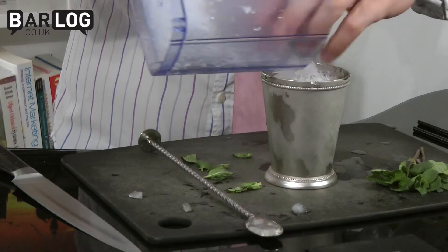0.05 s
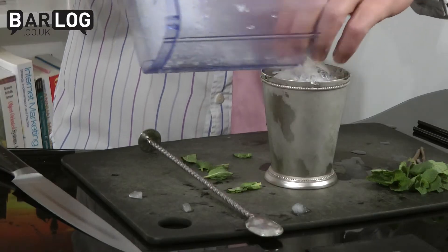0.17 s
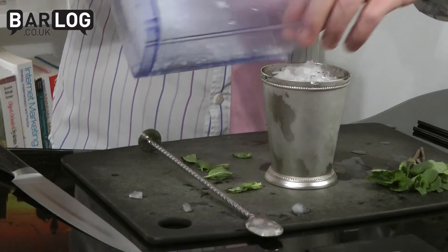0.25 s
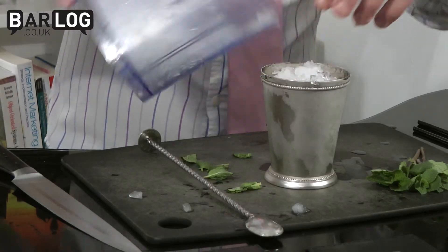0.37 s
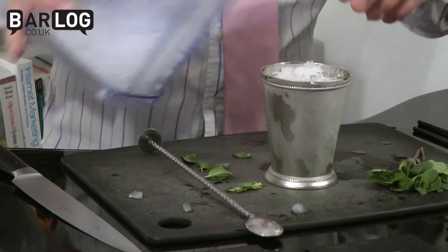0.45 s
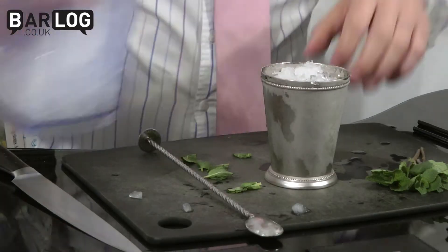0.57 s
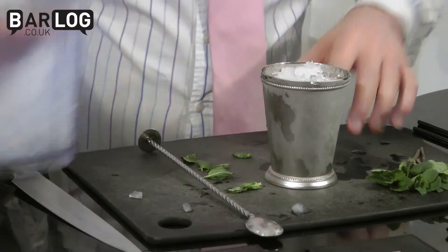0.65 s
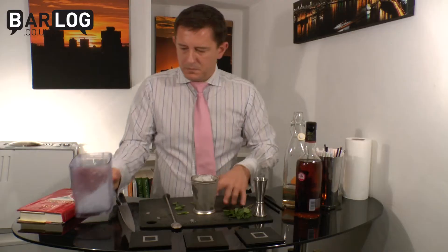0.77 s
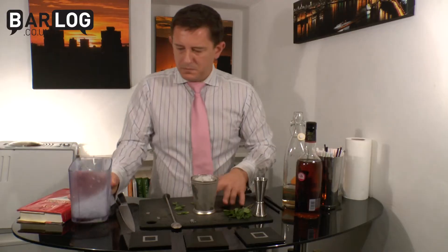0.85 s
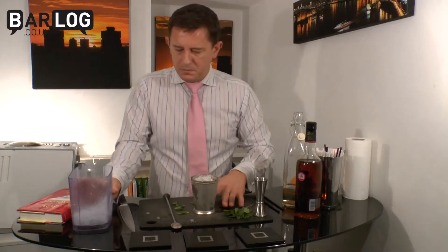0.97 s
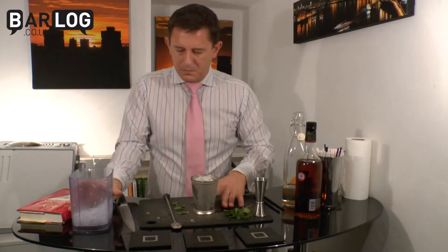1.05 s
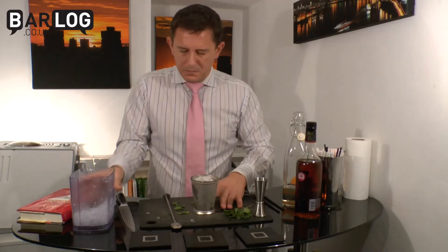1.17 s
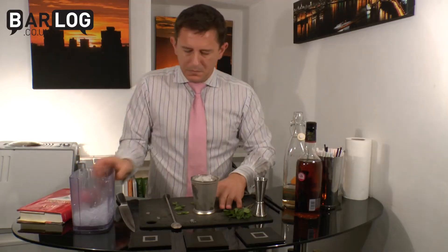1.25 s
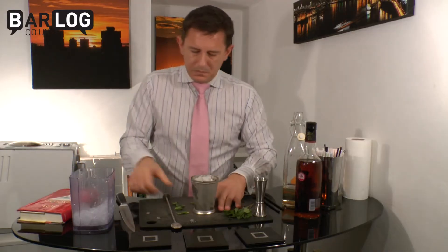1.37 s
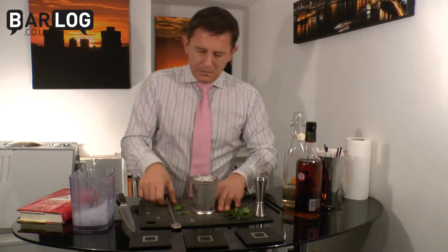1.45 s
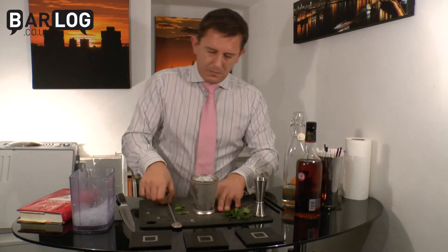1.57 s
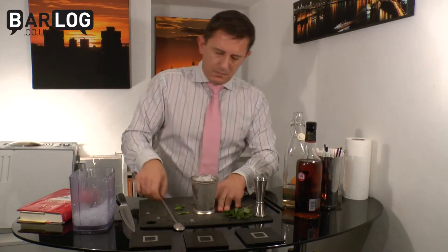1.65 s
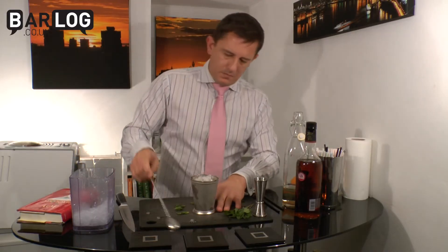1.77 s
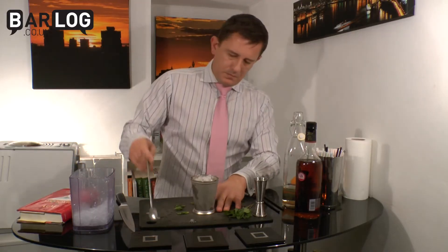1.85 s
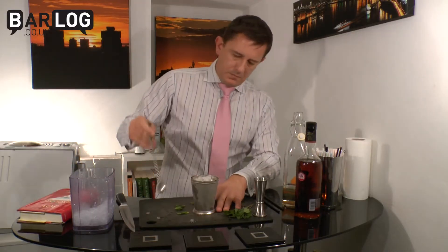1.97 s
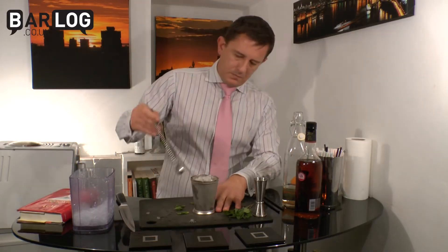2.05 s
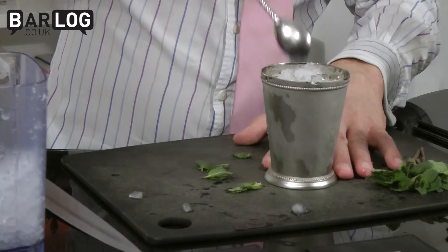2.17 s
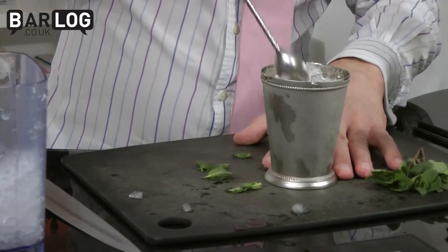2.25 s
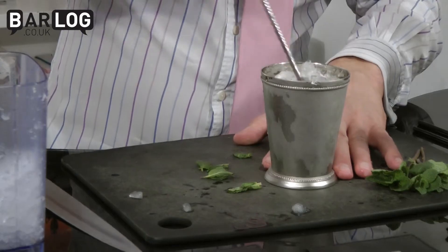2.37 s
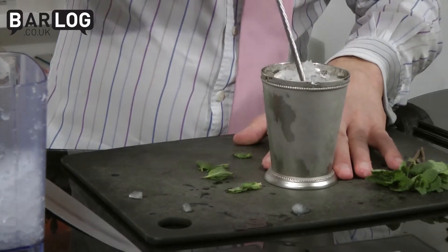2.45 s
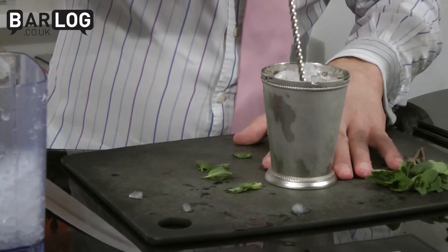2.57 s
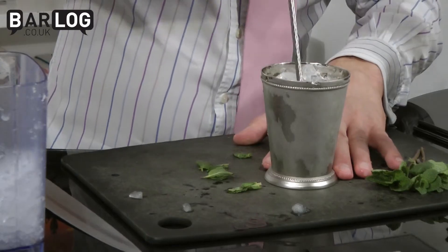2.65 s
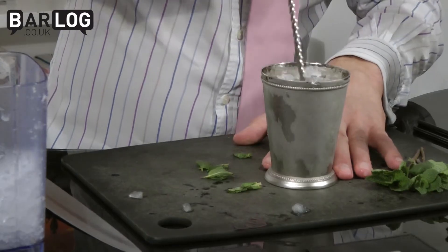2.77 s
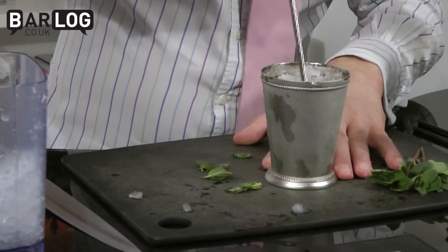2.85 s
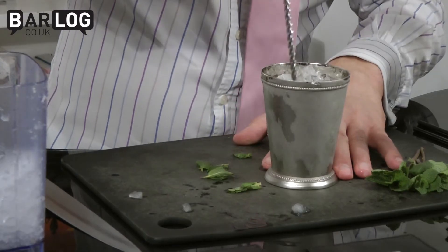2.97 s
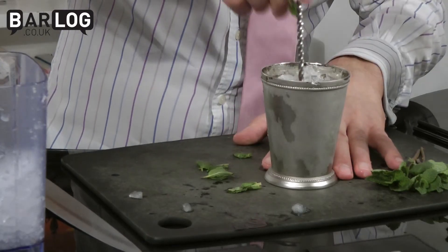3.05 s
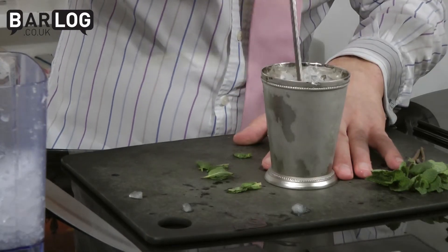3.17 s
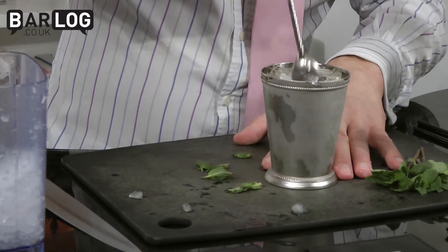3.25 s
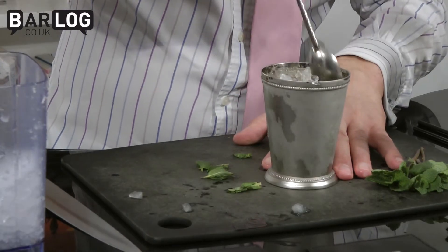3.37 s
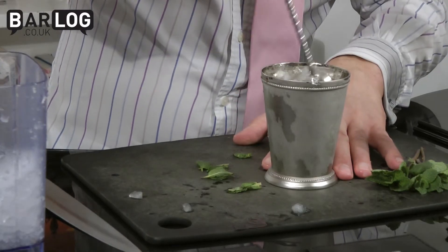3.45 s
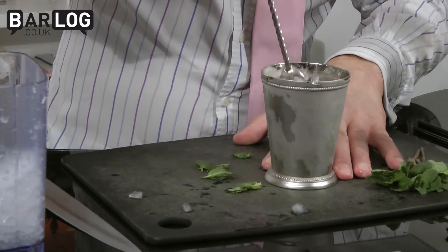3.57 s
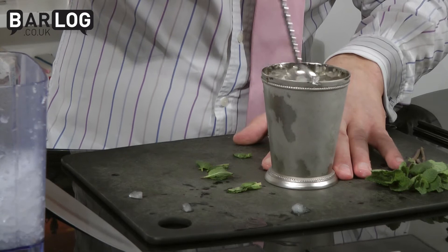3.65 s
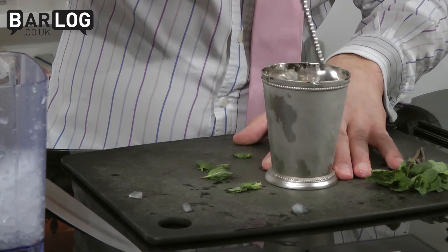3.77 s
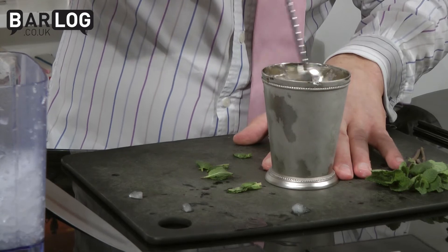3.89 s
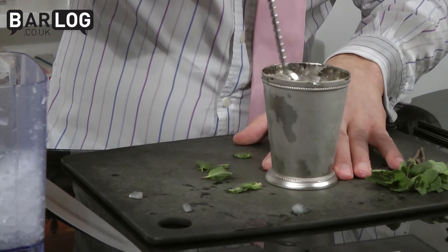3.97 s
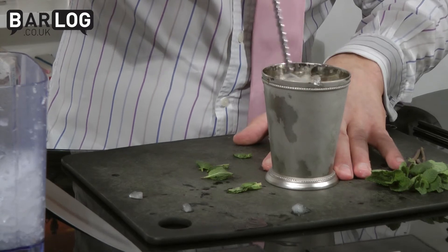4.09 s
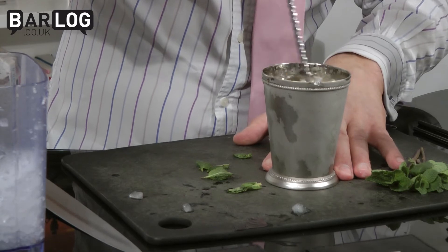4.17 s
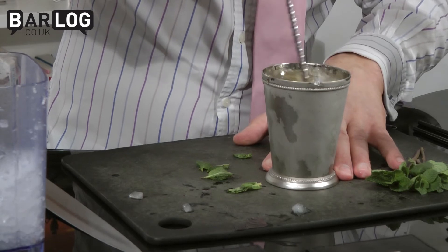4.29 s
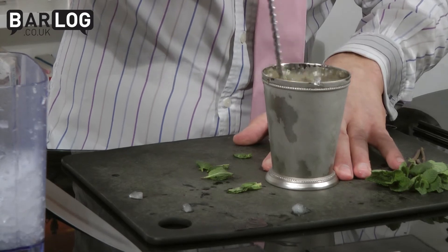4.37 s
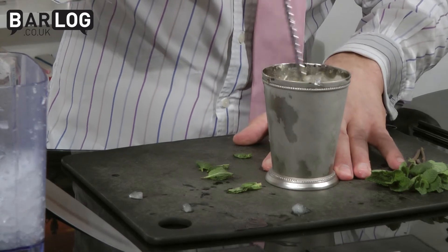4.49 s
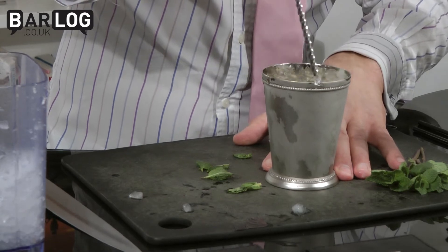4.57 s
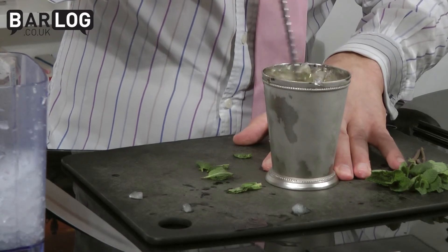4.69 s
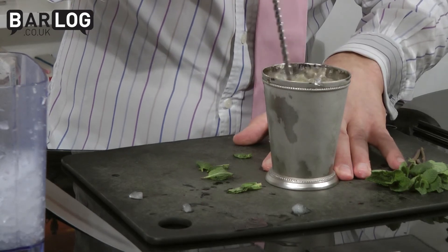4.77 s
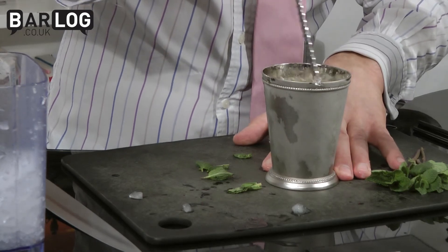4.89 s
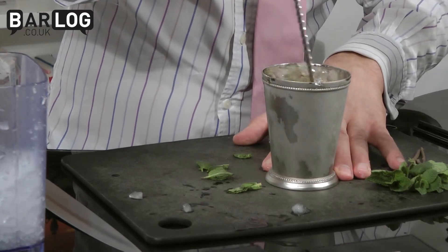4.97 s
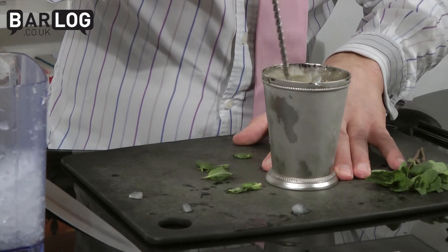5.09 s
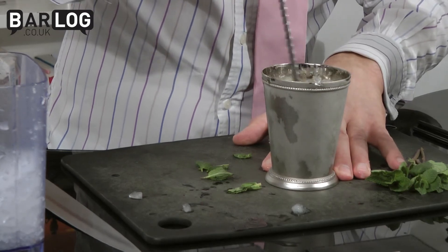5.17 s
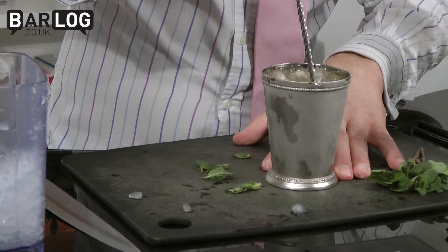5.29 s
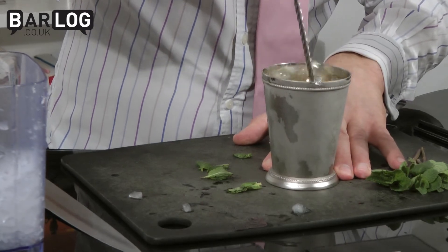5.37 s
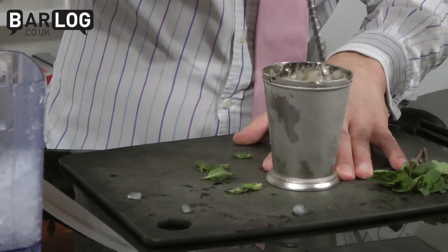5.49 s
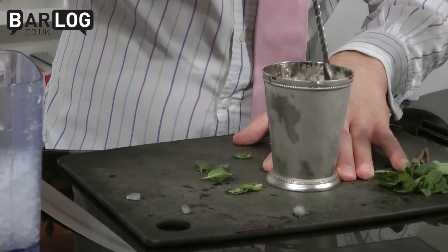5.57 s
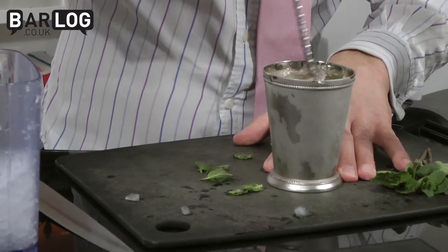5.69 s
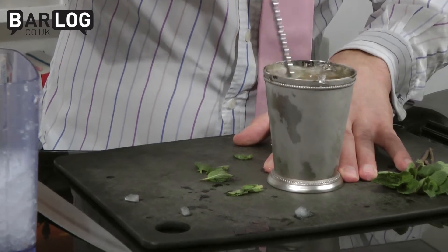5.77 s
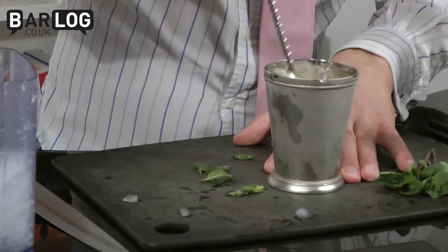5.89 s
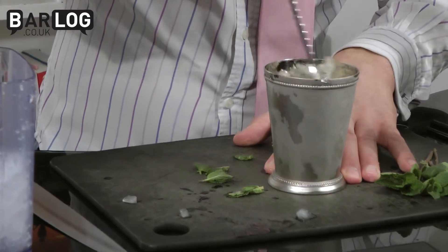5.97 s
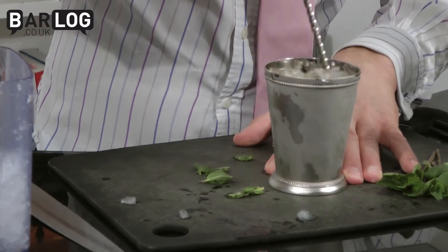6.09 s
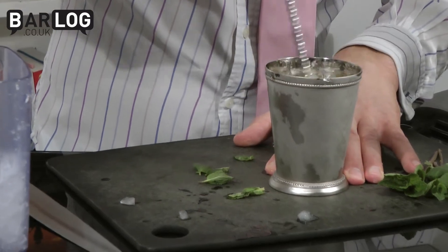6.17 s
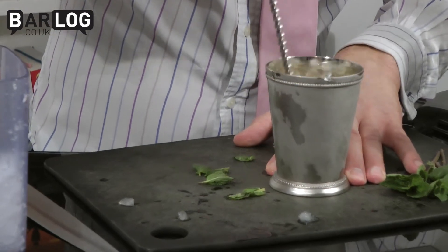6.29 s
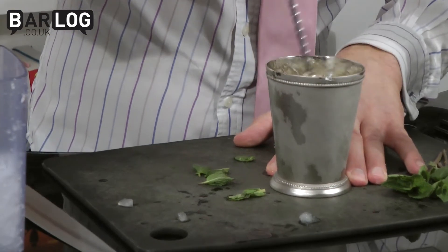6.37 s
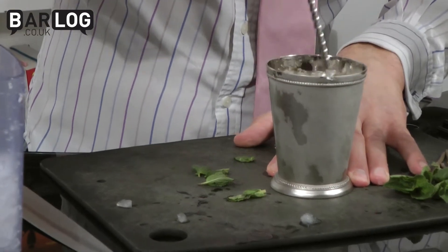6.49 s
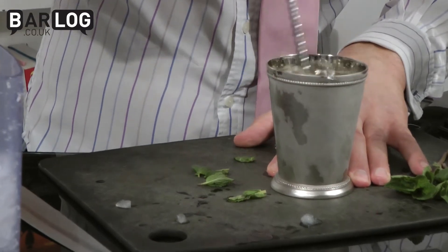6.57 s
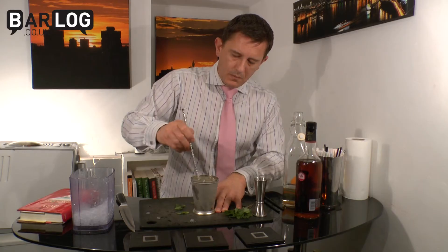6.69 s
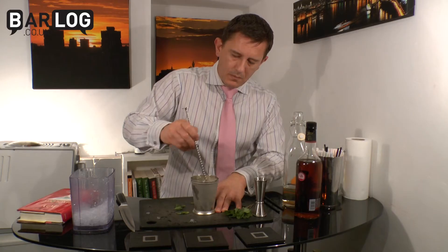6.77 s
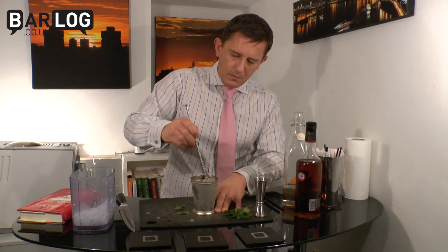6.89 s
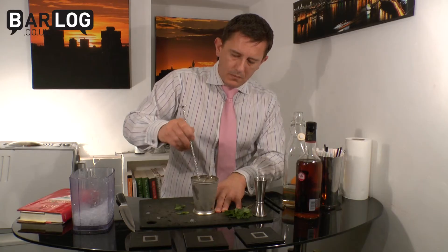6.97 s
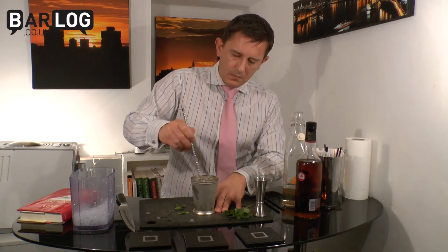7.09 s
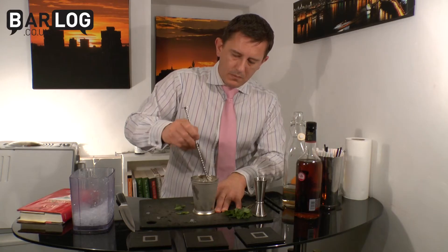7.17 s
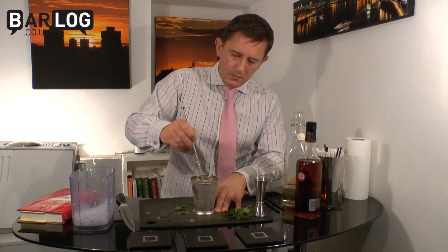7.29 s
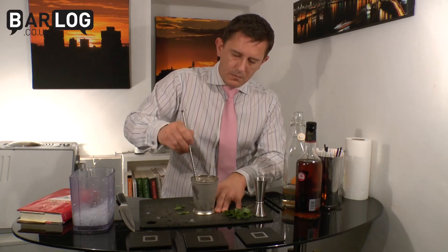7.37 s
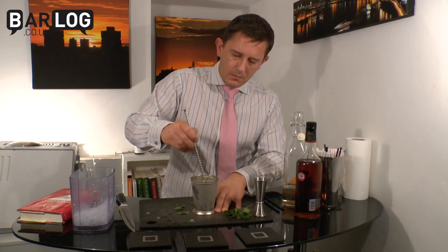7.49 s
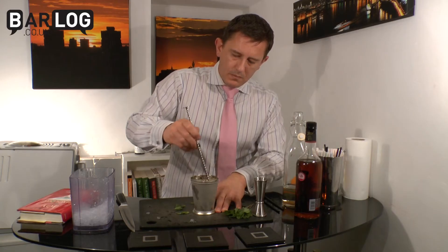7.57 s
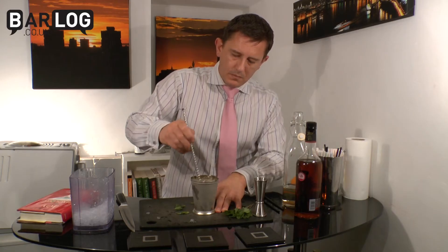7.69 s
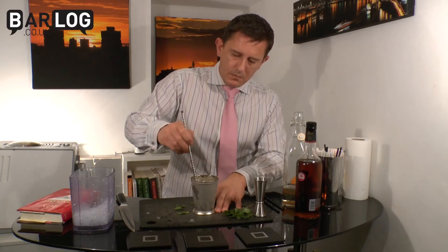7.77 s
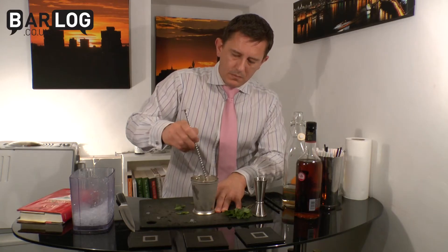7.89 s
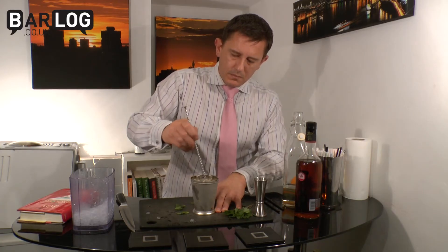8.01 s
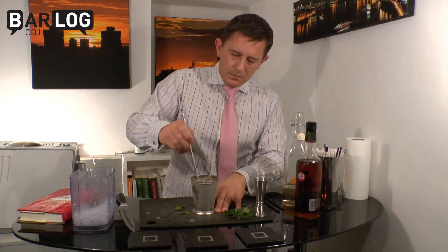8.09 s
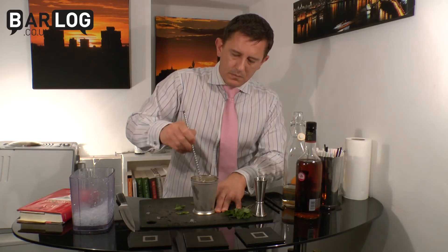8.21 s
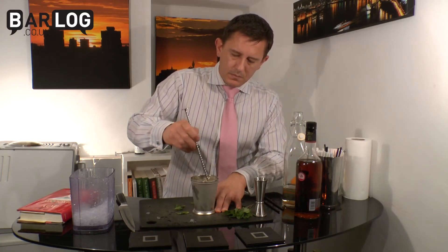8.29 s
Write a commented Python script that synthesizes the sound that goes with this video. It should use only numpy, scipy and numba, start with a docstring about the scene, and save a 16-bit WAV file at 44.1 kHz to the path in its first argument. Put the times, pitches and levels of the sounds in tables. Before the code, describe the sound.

Crushed ice slides and slaps in a plastic jug, the jug thuds down, a steel spoon rings, then crunchily churns ice in a metal cup.

```python
"""A fridge hums throughout: steady filtered noise with a thin whine. First crushed ice slides in a plastic jug
(many tiny decaying sines) and slaps its wall (noise bursts). At about 1 s the jug is set down on a glass table
and rocks; at 1.5 s a long steel spoon is picked up, ringing and scraping. From 2.3 s it churns the ice in a
metal cup, now and then striking wall and bottom. Noise tails make a small hard room answer all but the hum.
The right channel is the louder one, except in the deepest bass."""
import sys
import numpy as np
from scipy import signal
from scipy.fft import rfft, irfft, next_fast_len
from scipy.io import wavfile
from numba import njit

SR = 44100
rng = np.random.default_rng(int(sys.argv[2]) if len(sys.argv) > 2 else 0)


def waveform_to_disk(signal):
    """Save audio, clipped to [-1, 1], as 16-bit WAV at the path in sys.argv[1]."""
    frames = np.transpose(np.atleast_2d(signal))
    scaled = np.clip(frames, -1, 1) * 32767
    samples = np.round(scaled).astype(np.int16)
    wavfile.write(sys.argv[1], SR, samples)


N = 367794  # length in samples

# the jug meets the table and rocks: t/s, level/dB, level of the ice thrown about/dB, rise of that ice/s
JUG_DOWN = [(0.967, -1.5, -21, 0.0026), (1.058, -9, -22, 0.087)]
# the spoon strikes the cup: t/s, clink of the wall/dB, thud into the board/dB, favoured pitch f/Hz
CUP_HITS = [(2.5051, -14, -30, 6600), (2.5575, -11, -6, 3040), (2.5983, -46, -10.5, 6640),
            (3.0173, -15.5, -4.5, 2630), (3.0484, -18.5, -8, 3300), (3.1868, -21, -69, 6800),
            (3.48, -18.5, -60, 6300), (3.826, -11.5, -30, 4660), (4.3812, -21, -49, 5500),
            (4.8634, -24, -47, 5300), (4.9505, -14.5, -43, 3030), (5.115, -23, -55, 2770),
            (5.3, -24, -35, 2780), (5.4341, -27, -46, 6640), (5.6743, -11.5, -20, 6260),
            (5.9514, -35, -45, 4200), (5.9925, -5, -27, 3500), (6.2231, -15, -25.5, 2345),
            (6.6585, -18, -15.5, 2480), (6.7516, -22, -48, 7900), (7.3083, -21, -49, 5160),
            (7.4924, -19.5, -37, 9100), (7.6445, -19, -55, 4300), (7.7119, -20, -45, 4650),
            (7.9359, -20, -31, 3720), (8.1444, -18, -32, 5670), (8.2577, -21, -45, 6740)]
# tones of the board under the cup: f/Hz, level/dB, time to die by 60 dB/s
BOARD = [(234, -50, 0.18), (233.4, -5.5, 0.16), (268, -9, 0.11), (339.5, 8, 0.038), (413, -1, 0.088),
         (813, 13.5, 0.018), (1066, 9, 0.023), (1473, 3.5, 0.087), (1630, 13, 0.035), (1710, 12, 0.039)]


def undb(db):
    """Turn dB into a plain gain."""
    return 10 ** (np.asarray(db) / 20)


def unit(x):
    """Scale to an average strength (rms) of 1."""
    return x / np.sqrt(np.mean(x ** 2))


def colour(x, points):
    """Filter by points of f/Hz, level/dB, joined by straight lines on a log pitch axis."""
    size = next_fast_len(x.shape[-1])
    hz, db = np.transpose(points)
    bins_hz = np.fft.rfftfreq(size, 1 / SR)
    gain = undb(np.interp(np.log(bins_hz + 1), np.log(hz), db))
    return irfft(rfft(x, size) * gain, size)[..., :x.shape[-1]]


def add(track, at_s, sound):
    """Mix a sound into the track at a given time."""
    i = int(at_s * SR)
    track[i:i + len(sound)] += sound[:N - i]


def crack(t60, hz, span=2.76):
    """A noise burst from hz / span to hz * span (at most 20 kHz), dying by 60 dB in t60 seconds."""
    t = np.arange(SR // 2) / SR
    band = signal.butter(2, [hz / span, min(span * hz, 20000)], "bandpass", fs=SR, output="sos")
    noise = unit(signal.sosfilt(band, rng.standard_normal(len(t))))
    shape = np.minimum(t / 0.00073, 1) * np.exp(-np.log(1000) * t / t60)
    return noise * shape


def ring(modes, chatter_s=0.0049, hz_best=1000., reach=4.4):
    """One blow: a briefly chattering contact wakes fading tones, best near one pitch; peak 1."""
    hz, db, t60 = np.array(modes, float).T[:, :, None]
    t = np.arange(SR // 2) / SR
    tones = np.sin(2 * np.pi * hz * t) * np.exp(-np.log(1000) * t / t60)
    chatter = crack(chatter_s, 2330, 40)[None, :SR // 10]
    tones = signal.fftconvolve(tones, chatter, axes=1)[:, :len(t)]
    tones = tones / np.abs(tones).max(axis=1, keepdims=True)
    # a tone that lies "reach" octaves from the best pitch loses 6 dB
    gain = undb(db - 6 * (np.log2(hz / hz_best) / reach) ** 2)
    y = np.sum(gain * tones, axis=0)
    return y / np.abs(y).max()


def shaken(modes, count, hz_best=1000., reach=8.1):
    """A body kept ringing by many small random pushes; rms 1."""
    when, size = rng.random((count, 2)).T
    pushes = np.zeros(N)
    np.add.at(pushes, (when * N).astype(int), (size - .5) * undb(6 * size))
    return unit(signal.fftconvolve(pushes, ring(modes, 0.00424, hz_best, reach))[:N])


def swell(peak_s, db, rise_s, fall_db_s, hold_s=0):
    """Joint loudness of swells that climb to a peak, hold, then fall steadily in dB; powers add."""
    rise_db = 25  # climbed within the rise time
    t, power = np.arange(N) / SR, 0
    for peak, level, rise, hold in np.broadcast(peak_s, db, rise_s, hold_s):
        before = rise_db * (peak - t) / max(rise, 1e-3)
        after = fall_db_s * np.maximum(t - peak - hold, 0)
        drop = np.maximum(before, after)
        # silent once 60 dB down
        power = power + (drop < 60) * undb(level - np.minimum(drop, 60)) ** 2
    return np.sqrt(power)


@njit
def grains(start, hz, cycles, size, length):
    """Damped sines, mostly swollen within two cycles, that die by 40 dB in their number of cycles."""
    y = np.zeros(length)
    for k in range(len(start)):
        n = int(cycles[k] * SR / hz[k])
        # a complex number turns and shrinks by "step" at every sample
        step = np.exp((2j * np.pi * hz[k] / SR) - 4.6 / n)
        z = size[k] + 0j
        rest, rest_step = 1., np.exp(-hz[k] / SR)
        for i in range(int(start[k]), min(int(start[k]) + n, length)):
            z *= step
            rest *= rest_step
            y[i] += z.imag * (1 - rest)
    return y


def ice(spectrum, cycles, count, spread_db=1.9):
    """Chips of ice knock together: many small clicks of any pitch, a few large; rms 1."""
    when, pitch, life, size = rng.random((count, 4)).T
    hz_points, db_points = np.transpose(spectrum)
    # the power .6 makes small, high chips the more common ones
    hz = hz_points[0] * (hz_points[-1] / hz_points[0]) ** pitch ** .6
    db = np.interp(np.log(hz), np.log(hz_points), db_points)
    # a higher click is shorter and covers a wider band, so it needs 6 dB an octave more
    db = db + 20 * np.log10(hz) - spread_db * np.log(1 - size)
    sign = np.sign(life - size)
    return unit(grains(when * N, hz, cycles * (.5 + life), undb(db) * sign, N))


def hum():
    """Fridge and air: steady noise, alike in both channels only in the bass, with one thin whine."""
    # noise spectrum: f/Hz, level/dB per Hz, relative
    hum_bands = [(15, -57), (25, -26), (59, -6.5), (384, -8.5), (489, -20), (575, -7), (641, -31),
                 (775, -3.5), (887, -17), (1370, -17), (1520, -12.5), (2900, -14), (4300, -12.5),
                 (16000, -36.5)]
    # narrow whine: f/Hz, level against the noise/dB, time to die by 60 dB/s
    whine_tone = (690, -22, 0.21)
    hum_db = -45.5
    mid, side = rng.standard_normal((2, N))
    side = colour(side, [(60, -15), (300, 0.5), (1000, -1.5)])
    noise = unit(colour(mid + side * np.array([[1], [-1]]), hum_bands))
    whine_hz, whine_db, whine_t60 = whine_tone
    whine = undb(whine_db) * shaken([(whine_hz, 0, whine_t60)], count=20000)
    return undb(hum_db) * (noise + whine)


def room():
    """Two unrelated noise tails whose bands die at their own pace; a strong wall echo comes early."""
    # how long the room answers: f/Hz, time to die by 60 dB/s
    decay_times = [(250, 0.61), (1000, 0.46), (4000, 0.47), (12000, 0.31)]
    wall_s = 0.034
    t = np.arange(int(.7 * SR)) / SR
    decay_hz, decay_s = np.transpose(decay_times)
    tail = 0
    for hz in 125 * 2 ** np.arange(8):
        edges_hz = [hz / 2 ** .5, min(hz * 2 ** .5, 20000)]
        band = signal.butter(2, edges_hz, "bandpass", fs=SR, output="sos")
        t60 = np.interp(np.log(hz), np.log(decay_hz), decay_s)
        noise = signal.sosfilt(band, rng.standard_normal((2, len(t))))
        tail = tail + noise * np.exp(-np.log(1000) * t / t60)
    echo = 0.55 * np.exp(-((t - wall_s) / 0.0032) ** 2)
    tail = tail * (np.minimum(t / 0.0036, 1) + echo)
    return tail / np.sqrt(np.sum(tail ** 2, axis=1, keepdims=True))


def jug_slides():
    """Ice slides in the tilted jug, sounds the air of its hollow and slaps its wall."""
    # slides: t of the peak/s, level/dB, rise/s, hold/s, level of the hollow tone/dB
    slides = [(0.0, -41, .01, .005, -74), (0.145, -29.5, 0.032, 0.006, -43), (0.437, -52, 0.18, 0.078, -80),
              (0.565, -60, .01, .05, -80), (0.736, -32, 0.11, 0.15, -46.5),
              (0.814, -21.5, 0.01, 0.0057, -46)]
    # strength of the ice clicks in the jug by pitch: f/Hz, level/dB
    slide_clicks = [(590, -54), (1000, -19), (1520, -17.5), (1870, -8.5), (3050, -8), (4680, -6.5),
                    (11000, -17), (14200, -20), (16000, -19)]
    # tone of the hollow: f/Hz, time to die by 60 dB/s
    hollow_tone = (591, 0.059)
    # ice slaps the wall: t/s, level/dB, f/Hz
    slaps = [(0.131, -42, 3000), (0.1514, -26, 8150), (0.563, -39, 2040), (0.7289, -30, 2760),
             (0.8198, -13.5, 6500), (0.864, -20, 4750)]
    # the hollow tone stays level a little after the slide starts to fade, then stops quickly
    slide_fall_db_s, hollow_fall_db_s, hollow_extra_hold_s = 124, 400, 0.041
    peak_s, db, rise_s, hold_s, hollow_db = np.transpose(slides)
    hollow = shaken([(hollow_tone[0], 0, hollow_tone[1])], count=3000)
    out = swell(peak_s, db, rise_s, slide_fall_db_s, hold_s) * ice(slide_clicks, 38.0, count=40000)
    out += swell(peak_s, hollow_db, rise_s, hollow_fall_db_s, hold_s + hollow_extra_hold_s) * hollow
    for at_s, slap_db, hz in slaps:
        add(out, at_s, undb(slap_db) * crack(0.085, hz, 1.43))
    return out


def jug_lands():
    """The jug knocks on the table and rings; the ice thrown about rattles and shakes its wall."""
    # tones of the jug: f/Hz, level/dB, time to die by 60 dB/s
    jug_tones = [(203, -13.5, 0.184), (560, -7, 0.1), (599, 0, 0.09), (709, 7.5, 0.057), (791, 3.5, 0.033),
                 (1050, 7.5, 0.026), (1320, -3, .03), (1900, 12, 0.022), (2160, 7, 0.028),
                 (3200, 9.5, 0.013)]
    # ice knocking on the jug wall: f/Hz, level/dB
    wall_clicks = [(400, -19), (700, -14.5), (2000, -3), (4000, -13.5), (9000, -25.5)]
    at_s, _, rattle_db, rise_s = np.transpose(JUG_DOWN)
    rattle = ice(wall_clicks, 10.0, count=20000) + undb(-0.5) * shaken(jug_tones, count=8000)
    out = swell(at_s, rattle_db, rise_s, fall_db_s=126) * rattle
    for hit_s, db, *_ in JUG_DOWN:
        knock = ring(jug_tones, 0.022) + undb(-8.5) * crack(0.099, 1420) + undb(-39) * crack(0.027, 8000)
        add(out, hit_s, undb(db) * knock)
    return out


def jug():
    """The light jug radiates no deep bass; the table top gives once under its weight."""
    out = colour(jug_slides() + jug_lands(), [(100, -18), (200, -0.5)])
    t = np.arange(SR // 10) / SR
    table_thump = undb(-16.5) * np.sin(2 * np.pi * 55 * t) * np.exp(-t / 0.0045)
    add(out, JUG_DOWN[0][0], table_thump)
    return out


def spoon():
    """The free steel spoon rings and chatters; it scrapes the board as it is taken."""
    # spoon touched, dragged, knocked: t/s, ring/dB, scrape/dB, favoured pitch f/Hz, reach/octaves
    spoon_hits = [(1.46, -37, -40.5, 4000, 1.1), (1.513, -36, -33.5, 2700, 0.51),
                  (1.539, -19.5, -41, 3180, 0.48), (1.56, -31, -42, 3700, 0.57),
                  (1.647, -26.5, -41, 4000, 0.5), (1.676, -49, -35, 4470, .5),
                  (1.7085, -4.5, -52, 6000, 4.8), (1.729, -2.5, -64, 6000, 1.16),
                  (1.797, -15.5, -33.5, 6500, 0.44)]
    # tones of the spoon: f/Hz, level/dB, time to die by 60 dB/s
    spoon_tones = [(2730, -2, .07), (3580, -1, .11), (3660, 0, .07), (4495, -10, .12), (5491, -3, .1),
                   (5570, -3, .09), (6115, -6, .12), (6412, -10, .1), (6885, 2, .17), (8280, 1, .2),
                   (9502, -5, .1), (9841, -6, .14), (10930, -9, .1), (11230, -6, .08), (12210, -11, .1),
                   (13380, -7, .1), (13990, -13, .08), (15040, -7, .12)]
    out = np.zeros(N)
    for at_s, ring_db, scrape_db, hz, reach in spoon_hits:
        # a wide, hard knock is noisier
        chatter = reach * undb(-21) * crack(0.14, hz, 1.36)
        steel = ring(spoon_tones, 0.0096, hz, reach) + chatter
        scrape = crack(0.34, 1420)
        add(out, at_s, undb(ring_db) * steel + undb(scrape_db) * scrape)
    return out


def churn():
    """Spoon strokes make the ice click, the spoon ring and the board rumble; returns top and base."""
    # strokes: t of the peak/s, level/dB, rise/s, large lumps against that level/dB
    strokes = [(2.268, -28, 0.013, -3.5), (2.31, -30.5, 0.039, -2.5), (2.4, -34, 0.086, -11),
               (2.51, -28, 0.12, -35), (2.754, -35.5, 0.37, -2), (2.9, -33, 0.26, -29),
               (3.196, -30.5, 0.053, -7), (3.29, -45.5, 0.089, -20), (3.42, -33.5, 0.033, -5),
               (3.487, -28, 0.12, -1.5), (3.58, -34, 0.6, -1), (3.7, -33, 0.25, -3),
               (3.85, -30.5, 0.3, -15), (4.0, -32, 0.75, -7), (4.2, -29.5, 0.9, -7),
               (4.399, -27.5, 0.24, -5), (4.52, -33, .2, -4), (4.65, -29.5, 0.36, -3),
               (4.87, -29, 0.5, -20), (4.97, -28, 0.27, -13), (5.12, -34.5, 0.32, -2),
               (5.3, -29.5, 0.43, -9.5), (5.462, -32.5, 0.18, -4), (5.62, -31.5, 0.29, -24),
               (5.78, -30, 0.34, -19), (5.88, -30, .1, -3), (5.955, -27.5, 0.28, 5), (6.04, -37, 0.076, 0),
               (6.22, -26.5, 0.46, -13.5), (6.4, -31, 0.58, -4.5), (6.58, -29.5, 0.19, -29),
               (6.76, -27, 0.79, -4.5), (6.97, -26.5, 0.42, -6), (7.14, -27.5, 0.24, -5),
               (7.33, -26, 0.32, -10), (7.49, -27.5, 0.59, -4.5), (7.71, -27.5, 0.27, -12),
               (7.92, -27, 0.89, -4.5), (8.05, -24, 0.13, -16), (8.17, -28.5, 0.092, -2),
               (8.301, -27.5, 0.34, -19)]
    # strength of the ice clicks by pitch: f/Hz, level/dB
    ice_clicks = [(710, -66), (1200, -15), (1930, -11.5), (2560, -8.5), (2890, -9), (3950, -10.5),
                  (6440, -3.5), (10800, -16), (11800, -23), (14200, -20.5), (16000, -30)]
    # duller clicks of the large lumps: f/Hz, level/dB
    lump_clicks = [(1500, -38), (2500, -5.5), (4200, 3.5), (5500, -2.5), (8000, -21)]
    # tones of the held spoon: f/Hz, level/dB, time to die by 60 dB/s
    shaft_tones = [(6610, 10, 0.034), (6720, -19, .06)]
    # how strongly the held spoon rings: t/s, level against the strokes/dB
    shaft_ring = [(2.25, -34), (2.45, -1), (3.2, -4.5), (3.8, -14), (4.4, -37), (5.4, -33), (5.75, -2.5),
                  (6.2, -29), (8.34, -13.5)]
    stroke_fall_db_s, rumble_db = 71.5, -20.5  # rumble against the strokes
    jolt_db, jolt_rise_s, jolt_fall_db_s = -10, 0.0033, 704  # level against the clink
    peak_s, db, rise_s, lumps_db = np.transpose(strokes)
    effort = swell(peak_s, db, rise_s, stroke_fall_db_s)
    lumps = swell(peak_s, db + lumps_db, rise_s, stroke_fall_db_s)
    # the ice jumps at each strike on the cup
    hit_s, clink_db = np.transpose(CUP_HITS)[:2]
    jolt = swell(hit_s + jolt_rise_s / 2, clink_db + jolt_db, jolt_rise_s, jolt_fall_db_s)
    top = np.hypot(effort, jolt) * ice(ice_clicks, 56.0, count=60000)
    top += lumps * ice(lump_clicks, 74.0, count=5000)
    shaft_db = np.interp(np.arange(N) / SR, *np.transpose(shaft_ring))
    top += effort * undb(shaft_db) * shaken(shaft_tones, count=2000)
    rumble = shaken(BOARD, hz_best=310.0, reach=2.02, count=3000)
    base = effort * undb(rumble_db) * rumble
    return top, base


def strikes():
    """Spoon blows make the cup wall clink and thud through into the board; returns top and base."""
    # tones of the cup: f/Hz, level/dB, time to die by 60 dB/s
    cup_tones = [(2554, 5, 0.042), (2655, 1, 0.035), (3295, 6, 0.033), (3470, 2.5, 0.035), (3930, 3, 0.021),
                 (5180, -5, 0.02), (5070, 3.5, 0.022), (6860, -11, 0.046), (7190, -12, 0.046),
                 (8860, 2.5, 0.032)]
    thud_hz = 330.0  # where the board gives most easily
    push_s = .018  # swell time that the softest thuds approach
    t = np.arange(SR // 2) / SR
    top, base = np.zeros((2, N))
    for at_s, clink_db, thud_db, hz in CUP_HITS:
        clink = ring(cup_tones, 0.022, hz, 1.0) + undb(0.5) * crack(0.027, hz, 1.03)
        add(top, at_s, undb(clink_db) * clink)
        # a soft thud wakes only the board tones near thud_hz, and swells more slowly
        hard = undb(0.6 * thud_db)
        push = np.minimum(t / (push_s * (1 - hard)), 1)
        thud = ring(BOARD, 0.023, thud_hz, 5.8 * hard) + hard * undb(-4.0) * crack(0.056, 840)
        add(base, at_s, push * undb(thud_db) * thud)
    return top, base


def cup():
    """Chips and cup wall are too small to radiate low tones; the board gives no deep bass."""
    churn_top, churn_base = churn()
    strike_top, strike_base = strikes()
    top = colour(churn_top + strike_top, [(900, -7), (1500, -5.0), (2100, 0)])
    base = colour(churn_base + strike_base, [(70, -31), (160, 0.5)])
    return top + base


def scene():
    """Jug, spoon and cup are heard straight and through the room, over the hum."""
    room_db = -1
    bar = jug() + spoon() + cup()
    wet = signal.fftconvolve(bar[None], room(), axes=1)[:, :N]
    return bar + undb(room_db) * wet + hum()


def record(dry):
    """The left channel is weakened, most in the treble, but lifted slightly in the deepest bass; too loud peaks
    clip, then the top is cut."""
    # gain of the left channel: f/Hz, level/dB
    left_gain = [(60, 0.5), (200, -1.5), (380, -5.5), (700, -9.5), (4400, -11.5), (8100, -9.5),
                 (15000, -14)]
    top_hz = 15900
    both = np.array([colour(dry[0], left_gain), dry[1]])
    low_pass = signal.ellip(10, .2, 70, top_hz, fs=SR, output="sos")
    return signal.sosfilt(low_pass, np.clip(both, -1, 1))


dry = scene()
out = record(dry)
waveform_to_disk(out)
```